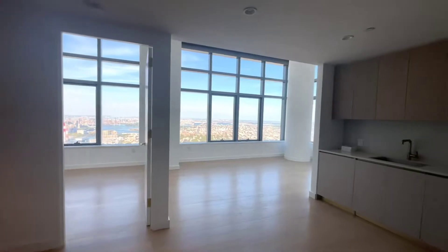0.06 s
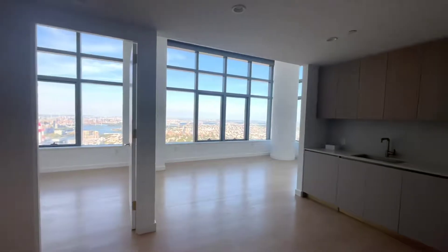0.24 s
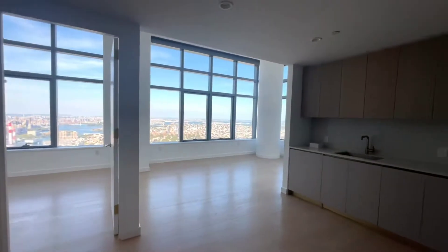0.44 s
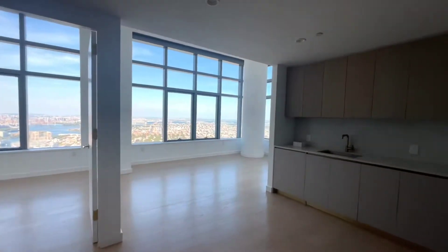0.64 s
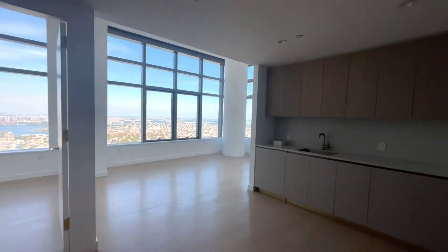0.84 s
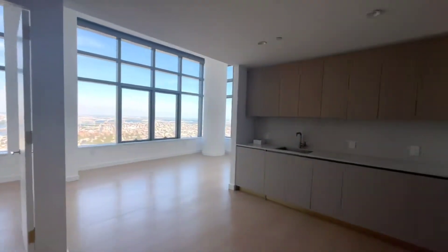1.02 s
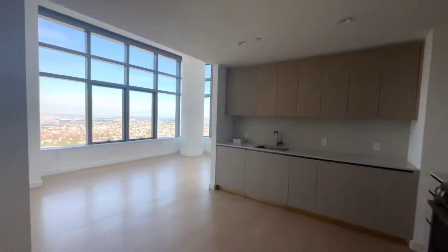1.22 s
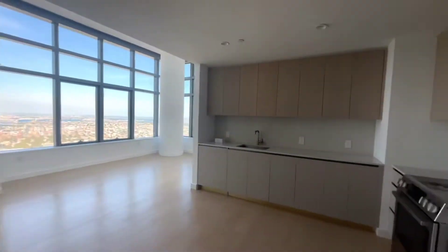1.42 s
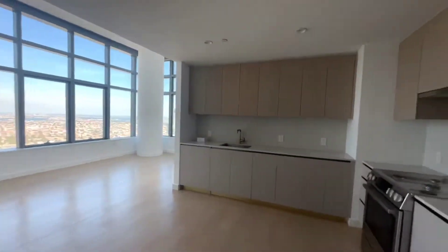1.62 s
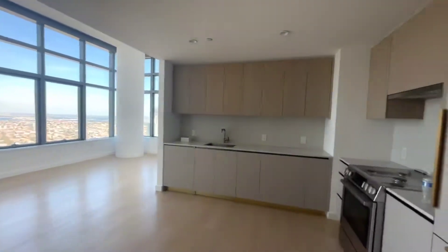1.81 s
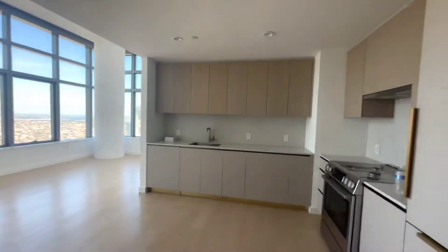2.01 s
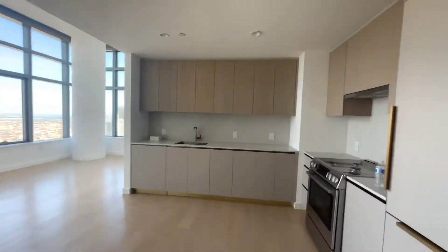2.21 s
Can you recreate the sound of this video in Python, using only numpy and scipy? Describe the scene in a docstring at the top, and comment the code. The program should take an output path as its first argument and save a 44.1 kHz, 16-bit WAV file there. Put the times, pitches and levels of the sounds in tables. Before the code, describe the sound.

A door shuts at about 0.25 seconds: the latch clicks sharply, the panel thuds and loose hardware rattles briefly. The empty apartment booms and rings for over a second. Faint ventilation rumble and appliance hum run underneath, growing a little from around 1 second. At 1.8 seconds comes a softer, duller door thump with small clicks, its echo carrying on to the end at about 2.3 seconds.

```python
"""An empty apartment with bare walls and a hard floor, heard on a small stereo microphone pair.
Ventilation rumbles underneath from the start. A quarter second in, a door shuts: the latch clicks and
pings, the panel thuds against its frame, loose hardware rattles and the room booms and rings on.
The ventilation grows as the microphone nears the kitchen. At 1.8 s comes a softer, duller door thump."""
import sys
import numpy as np
from scipy import signal
from scipy.fft import rfft, irfft, next_fast_len
from scipy.io import wavfile

SR = 44100
rng = np.random.default_rng(int(sys.argv[2]) if len(sys.argv) > 2 else 0)


def wav_record(signal):
    """Record a signal, one row per channel, as 16-bit PCM in the file named by sys.argv[1]."""
    frames = np.transpose(np.atleast_2d(signal))
    bounded = np.clip(frames, -1, 1)
    # unit amplitude maps onto the largest positive 16-bit level
    quanta = np.round(bounded * 32767).astype(np.int16)
    wavfile.write(sys.argv[1], SR, quanta)


N = 103635
T = np.arange(N) / SR
FFT_SIZE = 2 * next_fast_len((N + SR) // 2)
HZ = np.maximum(np.arange(FFT_SIZE // 2 + 1) * SR / FFT_SIZE, 1)

# the door meets its frame: start_s, relative_level_db, dull_above_hz, room_send_db, flex_delay_s
THUMPS = [(0.2386, -14, 508, -0.5, 0.01237), (1.8150, -20, 254, -1, 0.007)]
CLICK_T60_S, STRIKE_RISE_S, ROOM_RISE_S = 0.085, 0.00079, 0.004


def door_thuds():
    """The panel hits the frame with a dull knock. Yields (sound, room_send_db)."""
    # spectrum of the knock: frequency_hz, gain_db
    thud_spectrum = [(30, -2.5), (60, -7), (120, -1), (240, 4.5), (345, 5), (430, -8), (600, -1),
                     (900, -2.5), (1500, -7.5), (3000, -8.5)]
    for start_s, level_db, dull_above_hz, room_send_db, _ in THUMPS:
        body_db = at_hz(thud_spectrum) - 10 * np.log10(1 + (HZ / dull_above_hz) ** 4)
        impact = burst(start_s, rise_s=0.0083, t60_s=0.12)
        knock = rms_one(colour(impact, body_db)) * np.sqrt(10 / N)  # total energy of 10
        yield from_db(level_db) * knock, room_send_db


def door_boom():
    """Just after each impact the panel flexes briefly and sets the low room modes ringing."""
    # door panel modes: pitch_hz, t60_s, first_thump_db, second_thump_db
    panel_modes = [(67.3, 0.1, -23.5, -35), (141.7, .14, -32, -50), (206.6, 0.14, -29, -41),
                   (340.4, 0.088, -27, -62)]
    # low room modes: pitch_hz, t60_s, first_thump_db, second_thump_db
    room_modes = [(40.9, 2, -46.5, -71), (54.24, 2, -39, -37.5), (68.4, 1.83, -38.5, -43.5),
                  (101.5, 0.58, -41.5, -47.5), (157.2, 0.85, -41, -44), (187, 0.66, -53, -39),
                  (214.6, 1.46, -42.5, -48.5), (261.5, 2.1, -50.5, -58.5), (304.6, 1.41, -45, -55),
                  (339.4, 1.44, -48.5, -59), (354, 0.41, -56, -52)]
    boom_rise_s = 0.0143
    out = 0
    for thump, (start_s, *_, flex_delay_s) in enumerate(THUMPS):
        for modes, rise_s in (panel_modes, STRIKE_RISE_S), (room_modes, boom_rise_s):
            for pitch_hz, t60_s, *levels_db in modes:
                out += from_db(levels_db[thump]) * ring(start_s + flex_delay_s, pitch_hz, rise_s, t60_s)
    return out


def latch_clicks():
    """Latch and frame make sharp contacts. Yields (sound, room_send_db)."""
    # hard contacts: start_s, level_db, tilt_db_per_octave, room_send_db
    contacts = [(0.2334, -25.5, -2.5, 14), (0.2363, -15, 3, -0.5), (0.251, -16, 1.5, 5.5),
                (0.2525, -26, 1, 0.5), (0.266, -29, 14, -12), (1.8051, -21, -1.5, 6), (1.8130, -20, 0, -7),
                (1.825, -23, -3.5, 7), (1.8338, -26, 8, -4)]
    for start_s, level_db, tilt, room_send_db in contacts:
        snap = burst(start_s, rise_s=1 / SR, t60_s=CLICK_T60_S)
        yield from_db(level_db) * colour(snap, contact_spectrum(tilt)), room_send_db


def latch_pings():
    """Small metal parts ring briefly and leave their pitch hanging in the room."""
    # ringing latch parts: start_s, pitch_hz, level_db, t60_s, room_send_db, left_over_right_db
    pings = [(0.2347, 6090, -29, 0.0081, 0, 13), (0.2380, 9230, -30.5, 0.007, -8, -9),
             (0.335, 7400, -52, 0.12, 10, -2), (1.8238, 2456, -36.5, 0.01, 4.5, -7),
             (1.8950, 7420, -40.5, 0.053, -8, 0)]
    out = 0
    for start_s, pitch_hz, level_db, t60_s, room_send_db, pan_db in pings:
        ping = from_db(level_db) * ring(start_s, pitch_hz, STRIKE_RISE_S, t60_s)
        echoes = np.array([burst(0, ROOM_RISE_S, room_t60(pitch_hz)) for _ in range(2)])
        out += pan(ping, pan_db) + from_db(room_send_db) * filtered(ping, rfft(echoes, FFT_SIZE))
    return out


def hardware_rattles(touches_per_s=54, room_send_db=9):
    """Loose hardware chatters in random touches, each a dying noise. Yields (sound, room_send_db)."""
    # spells of rattling: start_s, length_s, level_db, tilt_db_per_octave
    rattles = [(0.261, .1, -20, -4.5), (0.37, .11, -29.5, 0), (1.805, .09, -30.5, -4.5)]
    for start_s, length_s, level_db, tilt in rattles:
        touches = (rng.random(N) < touches_per_s / SR) * rng.uniform(0.58, 1, N)
        touches *= (T > start_s) & (T < start_s + length_s)
        energy = energy_decay(touches / (touches.sum() + 1e-9), CLICK_T60_S)
        chatter = np.sqrt(energy) * rng.standard_normal(N)
        yield from_db(level_db) * colour(chatter, contact_spectrum(tilt)), room_send_db


def contact_spectrum(tilt_db_per_octave):
    """Spectrum of a hard contact in dB, tilted about 5 kHz."""
    # resonances of the latch: frequency_hz, gain_db
    latch_spectrum = [(400, 2.5), (1000, -4.5), (1500, -3), (2200, 1), (3200, -1), (4500, -3), (6200, -2.5),
                      (7200, -2.5), (9000, 1.5), (10200, -4), (11300, 5), (12500, -14)]
    return at_hz(latch_spectrum) + tilt_db_per_octave * np.log2(np.maximum(HZ, 500) / 5000)


def room_reverb(sound):
    """Diffuse field: in each third of an octave the energy builds up and dies at its own rate."""
    edges_hz = 36 * 2 ** (np.arange(27) / 3)
    fields = diffuse_noise(), diffuse_noise()  # neighbouring bands take turns
    out = 0
    for k, (low_hz, high_hz) in enumerate(zip(edges_hz, edges_hz[1:])):
        band = signal.butter(3, [low_hz, high_hz], "band", fs=SR, output="sos")
        energy = signal.sosfilt(band, sound + 1e-18) ** 2
        stored = energy_decay(energy, room_t60(np.sqrt(low_hz * high_hz)))
        wash = rms_one(signal.sosfilt(band, fields[k % 2]))
        out += np.sqrt(smoothed(stored, ROOM_RISE_S)) * wash
    return out


def room_t60(hz):
    """Seconds the bare rooms take to die away by 60 dB at one frequency."""
    # reverberation times: frequency_hz, t60_s
    decay_times = [(50, 0.51), (150, 1.69), (350, 1.09), (800, 2.27), (2000, 2.13), (3500, 1.94),
                   (5500, 1.34), (8000, 0.99), (12000, 0.56)]
    return at_hz(decay_times, hz)


def diffuse_noise():
    """White noise from all sides: alike at both microphones in the bass and at the top, less between."""
    # likeness of left and right: frequency_hz, correlation
    likeness = [(50, 0.99), (150, 0.99), (350, 0.82), (700, 0.416), (1400, 0.3), (3000, 0.53), (6000, 0.37),
                (8500, 0.57), (10200, 1), (12000, 0.99)]
    alike = np.clip(at_hz(likeness), -.99, .99)
    mid, side = filtered(rng.standard_normal((2, N)), np.sqrt([(1 + alike) / 2, (1 - alike) / 2]))
    return np.array([mid + side, mid - side])


def ventilation():
    """A dull rush of air that dips, then grows as the microphone nears the kitchen."""
    # spectrum of the moving air: frequency_hz, relative_db
    air_spectrum = [(25, -14.5), (40, -6.5), (55, 0), (80, -5.5), (130, -8), (200, -7), (290, -8),
                    (400, -4.5), (490, -4), (565, -12.5), (700, -6.5), (820, -1), (885, -6.5), (960, -18.5),
                    (1250, -28), (2000, -36), (3000, -40.5), (5000, -46.5), (9000, -51), (12000, -54)]
    # its level at the microphone: time_s, level_db
    air_levels = [(0, -57.5), (.5, -62.5), (.9, -59.5), (1.3, -57), (1.7, -55), (2.0, -52), (2.35, -53.5)]
    rush = rms_one(filtered(diffuse_noise(), from_db(at_hz(air_spectrum))))
    return rush * from_db(np.interp(T, *np.transpose(air_levels)))


def appliance_hum(waver_width_hz=13.2):
    """Faint appliance tones waver in level and phase; the top pair beats."""
    # appliance tones: pitch_hz, base_level_db, waver_depth, swell_share
    tones = [(180, -64, .5, 1), (468.6, -73, 0.6, 1), (824, -68.5, 1, 0.65), (1531, -81.5, .3, 0.92),
             (4240, -101, 0.2, 0.1), (4260, -99, 0.5, 0.1)]
    # a dip, then a swell as the microphone comes closer: time_s, gain_db
    swell = [(0, -4.5), (.9, -14.5), (1.3, -3), (1.47, 4), (1.75, 2.5), (2.35, 1)]
    swell_db = np.interp(T, *np.transpose(swell))
    slow_only = np.exp(-(HZ / waver_width_hz) ** 2)
    hum = 0
    for pitch_hz, base_level_db, waver_depth, swell_share in tones:
        flutter, wander = waver_depth * rms_one(filtered(rng.standard_normal((2, N)), slow_only))
        tone = (1 + flutter) * np.sin(2 * np.pi * pitch_hz * T + 2 * wander)
        hum += from_db(base_level_db + swell_share * swell_db) * tone
    return hum


def microphone_ports(sound):
    """The left and right ports resonate differently, so they differ in phase and level."""
    # port responses: frequency_hz, left_lead_rad, left_over_right_db, common_db
    ports = [(100, 0.5, 0, 1), (348, 0.47, 0, 0), (845, -1.3, 1, -1), (1500, -1.7, -2, 1),
             (2220, 0.8, 1, 1), (3300, 1.02, 2, 0), (6380, 0.45, 3.5, 0), (7900, 1.3, 3, 0.5),
             (8530, 0.2, -4, 0), (9780, -2.5, 6, 1.5), (10780, -4.5, -6, 1), (10830, -4.5, 0, 5),
             (11430, -4.5, 1, -2.5)]
    lead_rad, balance_db, common_db = (at_hz(np.array(ports)[:, [0, k]]) for k in (1, 2, 3))
    left = from_db(common_db + balance_db / 2)
    right = from_db(common_db - balance_db / 2) * np.exp(-1j * lead_rad)
    return filtered(sound, np.array([left, right]))


def envelope(start_s, rise_s, t60_s):
    """Quick rise, exponential decay."""
    age_s = np.maximum(T - start_s, 0)
    return (1 - np.exp(-age_s / rise_s)) * np.exp(-np.log(1000) * age_s / t60_s)


def ring(start_s, pitch_hz, rise_s, t60_s):
    """One struck mode."""
    return envelope(start_s, rise_s, t60_s) * np.sin(2 * np.pi * pitch_hz * (T - start_s))


def burst(start_s, rise_s, t60_s):
    """A contact and its reflections: dying noise of unit energy."""
    shape = envelope(start_s, rise_s, t60_s)
    return rng.standard_normal(N) * shape / np.sqrt(np.sum(shape ** 2))


def energy_decay(energy, t60_s):
    """Store incoming energy and let it fall 60 dB in t60_s."""
    return smoothed(energy, t60_s / (2 * np.log(1000)))


def smoothed(x, time_constant_s):
    """One-pole smoothing."""
    pole = np.exp(-1 / (time_constant_s * SR))
    return signal.lfilter([1 - pole], [1, -pole], x + 1e-18)


def colour(x, gain_db):
    """Causal (minimum-phase) filter with the given gain at every frequency."""
    cepstrum = irfft(np.log(from_db(gain_db)), FFT_SIZE)
    cepstrum[1:FFT_SIZE // 2] *= 2
    cepstrum[FFT_SIZE // 2 + 1:] = 0
    return filtered(x, np.exp(rfft(cepstrum)))


def filtered(x, response):
    """Apply a frequency response."""
    return irfft(rfft(x, FFT_SIZE) * response, FFT_SIZE)[..., :N]


def at_hz(points, hz=HZ):
    """Read a table along a log frequency axis."""
    points_hz, values = np.transpose(points)
    return np.interp(np.log(hz), np.log(points_hz), values)


def pan(x, db):
    """Place a sound left (+) or right (-)."""
    return x * from_db([[db / 2], [-db / 2]])


def from_db(db):
    """Decibels to gain."""
    return 10 ** (np.asarray(db) / 20)


def rms_one(x):
    """Scale to rms 1."""
    return x / np.sqrt(np.mean(x ** 2) + 1e-20)


def scene():
    """The door, almost straight ahead, heard directly and through the room over air and hum."""
    direct, into_room = 0, 0
    for sound, room_send_db in [*door_thuds(), *latch_clicks(), *hardware_rattles()]:
        direct += sound
        into_room += from_db(room_send_db) * sound
    door = pan(direct, db=0.5) + room_reverb(into_room) + door_boom() + latch_pings()
    return door + ventilation() + appliance_hum()


def record(dry):
    """A small microphone pair; the top is cut steeply."""
    cutoff_hz = 11900
    lowpass = signal.ellip(10, .3, 80, cutoff_hz, fs=SR, output="sos")
    return signal.sosfilt(lowpass, microphone_ports(dry))


dry = scene()
out = record(dry)
wav_record(out)
```